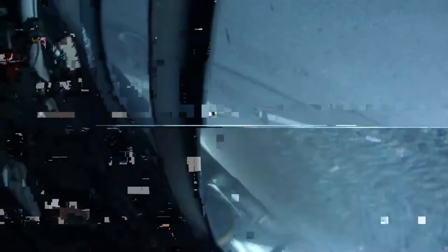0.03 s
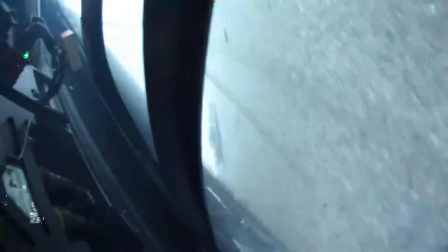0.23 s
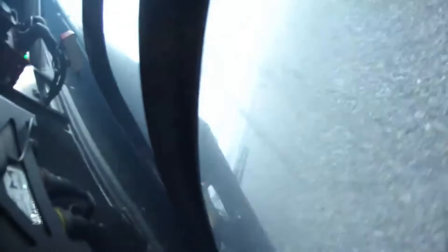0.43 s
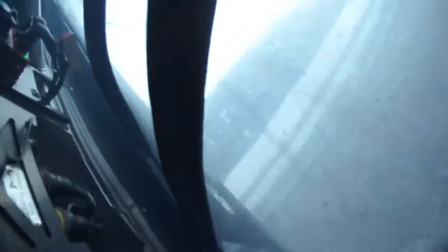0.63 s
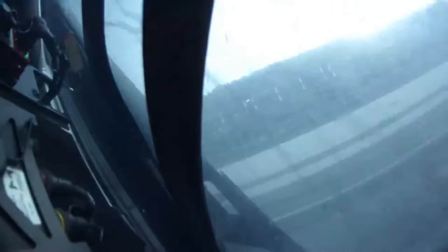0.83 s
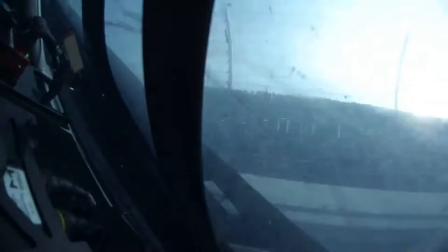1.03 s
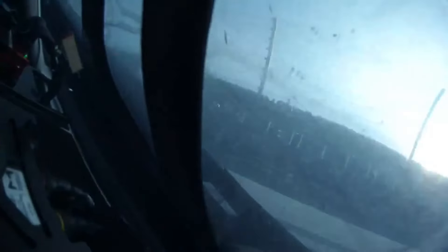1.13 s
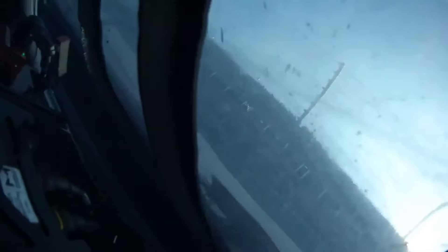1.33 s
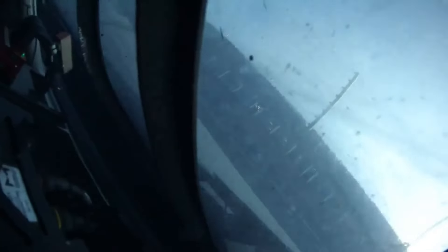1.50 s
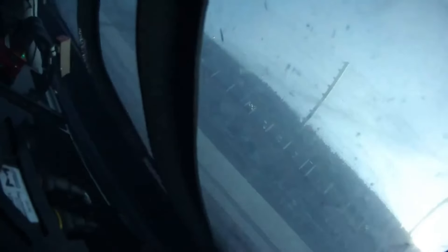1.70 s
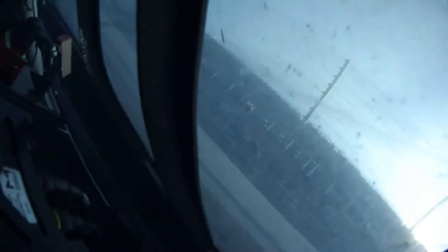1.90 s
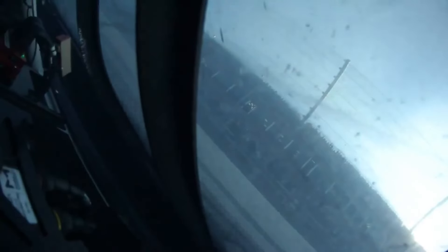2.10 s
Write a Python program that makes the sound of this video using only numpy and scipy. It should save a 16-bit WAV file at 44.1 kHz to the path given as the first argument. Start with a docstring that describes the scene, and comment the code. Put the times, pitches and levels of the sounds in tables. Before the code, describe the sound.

A tumbling race car hits the ground with a hard knock, scrapes and a heavy crunch.

```python
"""A race car tumbles over grass and asphalt, heard from inside the cockpit.
At 0.2 s a hard knock jolts the microphone mount; bodywork then scrapes along the ground in bursts,
with lighter knocks, over the low rumble of the sliding car and a faint drone.
Near 1.4 s the chassis lands with one heavy crunch and rings briefly; the ring drops away quickly.
The wreck goes on shaking faintly through a last knock and a few weak scrapes."""
import sys
import numpy as np
from scipy import signal
from scipy.fft import rfft, irfft
from scipy.io import wavfile

SR = 44100
rng = np.random.default_rng(int(sys.argv[2]) if len(sys.argv) > 2 else 0)


def inscribe(sig):
    """Save sig as 16-bit PCM at rate SR to the path in sys.argv[1].

    A 1-D sig is mono; a 2-D sig holds one channel per row.
    Samples are clipped to [-1, 1] before scaling.
    """
    pcm = np.round(np.clip(np.atleast_2d(sig).T, -1, 1) * 32767)
    wavfile.write(sys.argv[1], SR, pcm.astype(np.int16))


N = 94815

# spectra of sliding, grinding, hissing and cracking: frequency_hz, relative_db
RUMBLE_SPECTRUM = [(25, -3.5), (50, -5), (100, -1.5), (135, 0.5), (200, -3), (350, -3.5), (480, -3),
                   (700, -6), (1100, -10), (2200, -18), (4500, -27.5), (9000, -39), (16000, -60.5)]
GRIND_SPECTRUM = [(30, -10), (150, -6), (400, -5.5), (750, -4), (1300, -2.5), (2300, -6), (3200, -7.5),
                  (4500, -18.5), (9000, -38), (16000, -63)]
HISS_SPECTRUM = [(30, -29), (1500, -18.5), (3500, -5.5), (6500, 3), (8500, -4.5), (10500, -12.5),
                 (13500, -16), (16000, -30)]
CRUNCH_SPECTRUM = [(25, -7), (60, -9), (190, -2), (290, -12), (450, -1.5), (660, -7), (1100, -2.5),
                   (1500, -8), (2100, -7.5), (3100, -12.5), (4300, -16), (8000, -22.5), (12800, -39.5),
                   (15000, -49)]
# envelope of the rumble: time_s, level_db
RUMBLE_LEVELS = [(.2, -39.5), (.28, -45.5), (.46, -47), (.6, -56.5), (.69, -51.5), (.78, -41), (.88, -54),
                 (.98, -55), (1.06, -58.5), (1.33, -58.5), (1.46, -44), (1.58, -53.5), (1.72, -53),
                 (1.8, -49), (1.91, -62.5), (2.06, -55), (2.15, -62)]
# course of the drone: time_s, pitch_hz, level_db
DRONE_TRACK = [(.2, 106.8, -61), (.55, 106.5, -58), (.78, 107.7, -51.5), (.92, 88.8, -72), (1.151, 81, -66),
               (1.352, 80.9, -64), (1.8, 99.1, -68), (1.95, 97, -66), (2.1, 99.5, -60.5)]
# resonances of the shaking wreck and the scraping panels: centre_hz, width_hz, relative_db
WRECK_RESONANCES = [(466, 17, -7), (595, 21, 3.5), (855, 35, 0), (970, 59, -8.5)]
PANEL_RESONANCES = [(1299, 41, 3), (1513, 50, -0.5), (1810, 32, 4.5), (1950, 92, -1), (2173, 70, -4),
                    (2755, 64, -11.5)]
# resonances of the left microphone port: centre_hz, width_hz, added_gain
PORT_RESONANCES = [(1656, 1340, 1.3), (5460, 340, 3.88), (12100, 390, 4.6)]
# bodywork touching the ground: peak_s, attack_s, release_s, grind_db, hiss_db, hollow_db, balance_db
GROUND_CONTACTS = [ (0.2021, .0015, .03, -37.5, -48.5, -52.5, 1), (.288, 0.015, 0.027, -45, -51.5, -52, 1),
                   (.345, 0.02, 0.019, -56.5, -70, -43.5, 5), (0.409, 0.068, 0.057, -52, -65.5, -55, 11),
                   (0.477, 0.019, 0.065, -51.5, -59, -48, 2.5), (0.663, 0.0098, 0.14, -58.5, -64, -63, -1),
                   (0.715, 0.0083, 0.017, -44, -55.5, -35.5, 28.5),
                   (0.752, 0.037, 0.051, -41, -49.5, -64, 2), (0.776, .008, .016, -36, -54, -61, 3.5),
                   (0.96, 0.0051, .014, -60.5, -61, -61, 1), (0.979, 0.021, 0.033, -54.5, -60, -54, -0.5),
                   (1.205, 0.025, 0.036, -68.5, -65.5, -80.5, 1.5),
                   (1.267, 0.021, 0.043, -57, -66, -59, 3.5), (1.49, 0.066, 0.15, -53.5, -61.5, -62, 0),
                   (1.805, 0.046, 0.061, -56, -70.5, -67, 4), (1.956, .006, 0.035, -62.5, -71.5, -70, 2),
                   (2.058, 0.055, 0.055, -58.5, -78, -62, 4)]
# low blows to the frame: start_s, pitch_hz, rise_s, level_db
FRAME_THUMPS = [(0.2211, 140, .0018, -22), (0.453, 45, 0.006, -48), (0.775, 49.4, .005, -49),
                (1.383, 55, 0.006, -27), (1.7748, 55.8, 0.0046, -45.5)]
# blows to the mount: start_s, snap_hz, snap_rise_s, snap_db, snap_balance_db, rebound_share,
# thud_hz, thud_rise_s, thud_db, thud_balance_db, tick_db
MOUNT_KNOCKS = [ (0.2207, 1857, 0.00013, 8, -33, 0.7, 358, 0.00056, -6.5, 7, -17),
                (.7127, 1380, 0.00014, -18.5, 24, 0, 305, 0.0019, -30, 4.5, -44),
                (0.7783, 1510, .00015, -18, 19, 0.53, 149, 0.00096, -31.5, 4, -42),
                (1.1092, 920, 0.0003, -24, 22, 0, 504, 0.00097, -40, -13, -40),
                (1.3735, 1800, .00008, -20, 4, 0.15, 458, 0.0018, -24, -1.5, -31),
                (1.3932, 2200, 0.00013, -2.5, -27, 0.14, 300, 0.00035, -20.5, 13, -21),
                (1.4104, 1600, 0.00007, -9, -26, 0, 400, 0.00078, -16.5, -11, -34),
                (1.7745, 850, 0.00035, -20, 19, 0, 427, 0.00085, -33.5, -29, -38)]
# chassis modes before the quick fade: pitch_hz, relative_db, t60_s
CHASSIS_MODES = [(48.7, -4.5, 1), (115.6, -5.5, 0.46), (168, -9, 0.26), (215, -3.5, 0.083), (469, 1, .25),
                 (563, 3, 0.14), (750, -3, 0.21), (854, -7, 0.71), (1072, -13, 0.41), (1114, -16, 0.49),
                 (1245, -10, 0.22), (1942, -9.5, .25), (3926, -25, 0.27), (4310, -11, 0.24)]

START_S, FADE_S = 0.1956, .002
LANDING_S, LANDING_ATTACK_S = 1.374, 0.0036


def undb(db):
    """Amplitude ratio of a level in decibels."""
    return 10 ** (np.asarray(db) / 20)


def unit(x):
    """Normalisation to rms 1."""
    return x / np.sqrt(np.mean(x ** 2))


def pan(db):
    """Level panning by a balance of left minus right; the louder side keeps its level."""
    return undb(np.minimum([[db], [-db]], 0))


def colour(x, points):
    """Minimum-phase filtering through (frequency_hz, gain_db) points."""
    hz, db = np.array(points, float).T
    size = 4096
    bins_hz = np.maximum(np.arange(size // 2 + 1) * SR / size, 1)
    cepstrum = irfft(np.log(undb(np.interp(np.log(bins_hz), np.log(hz), db))))
    cepstrum[1:size // 2] *= 2
    cepstrum[size // 2 + 1:] = 0
    response = irfft(np.exp(rfft(cepstrum)))
    return signal.fftconvolve(x, response[None], axes=1)[:, :N]


def bandpass(x, hz, width_hz):
    """Response of one damped resonator."""
    return signal.lfilter(*signal.iirpeak(hz, hz / width_hz, fs=SR), x)


def resonate(x, rows):
    """Superposition of resonators (centre_hz, width_hz, relative_db), scaled to rms 1."""
    return unit(sum(undb(db) * bandpass(x, hz, width) for hz, width, db in rows))


def grit(per_s, spread_db):
    """Shot noise: three independent streams of tiny impacts of uneven size."""
    hits = (rng.random((3, N)) < per_s / SR) * rng.standard_normal((3, N))
    return unit(hits * undb(spread_db * np.minimum(rng.exponential(size=(3, N)), 4)))


def stereo(x, shared_hz):
    """Partial coherence: both sides share the bass, while the treble is independent."""
    low, high = (signal.butter(2, shared_hz, kind, fs=SR, output="sos") for kind in ("low", "high"))
    return signal.sosfilt(low, x[2]) + signal.sosfilt(high, x[:2])


def swell(t, attack_s, release_s, hold_s=0):
    """Gaussian attack up to time zero, hold, exponential decay."""
    return np.exp(-(np.minimum(t, 0) / attack_s) ** 2 - np.maximum(t - hold_s, 0) / release_s)


def jolt(t, hz, rise_s):
    """Heavily damped oscillation of a few cycles at most."""
    t = np.maximum(t, 0)
    return t / rise_s * np.exp(1 - t / rise_s) * np.sin(2 * np.pi * hz * t)


def drone(t):
    """A faint low tone on the right wavers by random frequency and amplitude modulation."""
    at, hz, db = np.array(DRONE_TRACK).T
    waver = unit(colour(rng.standard_normal((1, N)), [(1, -4.5), (12, 2), (40, -31), (200, -91)]))[0]
    phase = 2 * np.pi * np.cumsum(np.interp(t, at, hz) * (1 + .025 * waver)) / SR
    return np.sqrt(2) * np.sin(phase) * undb(np.interp(t, at, db) + 1.5 * waver) * pan(db=-12)


def rumble(t):
    """Sliding friction: the car makes low broadband noise, more to the right."""
    noise = unit(colour(stereo(rng.standard_normal((3, N)), shared_hz=590), RUMBLE_SPECTRUM))
    at, db = np.array(RUMBLE_LEVELS).T
    return noise * undb(np.interp(t, at, db)) * pan(db=-12)


def shake(t):
    """Random excitation: after the landing the shaking wreck rings faintly at its resonances."""
    ring = resonate(stereo(rng.standard_normal((3, N)), shared_hz=800), WRECK_RESONANCES)
    return undb(-56.5) * ring * swell(t - LANDING_S, LANDING_ATTACK_S, release_s=.8) * pan(db=-1)


def scrapes(t):
    """Friction on grit drives the panels: coarse grinding, fine hiss and the shell's hollow note."""
    grains = stereo(grit(per_s=9000, spread_db=1.5), shared_hz=497)
    panels = undb(-11.5) * resonate(grains, PANEL_RESONANCES)
    grind = unit(unit(colour(grains, GRIND_SPECTRUM)) + panels)
    hiss = unit(colour(grit(per_s=17000, spread_db=2.0)[:2], HISS_SPECTRUM))
    shell = [(355, 110, 0)]  # centre_hz, width_hz, relative_db
    noise = stereo(rng.standard_normal((3, N)), shared_hz=700)
    hollow = resonate(resonate(noise, shell), shell) * pan(db=-8.5)
    power = 0  # overlapping contacts add in power
    for at, attack, release, grind_db, hiss_db, hollow_db, balance in GROUND_CONTACTS:
        contact = swell(t - at, attack, release) * pan(balance)
        power = power + np.multiply.outer(undb([grind_db, hiss_db, hollow_db]) ** 2, contact ** 2)
    return np.sum(np.sqrt(power) * np.array([grind, hiss, hollow]), axis=0)


def left_port(x):
    """Resonance in the left microphone port colours the airborne sound."""
    peaks = sum(gain * bandpass(x[0], hz, width) for hz, width, gain in PORT_RESONANCES)
    return np.array([x[0] + peaks, x[1]])


def thumps(t):
    """Impulsive loading: the weight of the car comes down on its frame."""
    return sum(undb(db) * jolt(t - at, hz, rise) for at, hz, rise, db in FRAME_THUMPS)


def knocks(t, rebound_s=.00082, thud_lag_s=.00052):
    """Shock excitation: each knock ticks and snaps the mount, may rebound, and leaves a dull thud."""
    tick_spectrum = [(500, -16), (3500, 3), (6000, -4.5), (10000, -17.5), (16000, -30)]
    fizz = unit(colour(rng.standard_normal((2, N)), tick_spectrum))
    out = 0
    for (at, hz, rise, snap_db, balance, rebound,
         thud_hz, thud_rise, thud_db, thud_balance, tick_db) in MOUNT_KNOCKS:
        age = t - at
        snap = undb(snap_db) * (jolt(age, hz, rise) + rebound * jolt(age - rebound_s, hz, rise))
        tick = undb(tick_db) * fizz * swell(age - rise, attack_s=.0001, release_s=.0007)
        thud = undb(thud_db) * jolt(age - thud_lag_s, thud_hz, thud_rise)
        out = out + pan(balance) * (tick - snap) + pan(thud_balance) * thud
    return out


def chassis_ring(t, rattle_depth=0.25, lag_s=.006):
    """Modal vibration: the landed chassis rings, modulated by loose parts; the ring then fades fast."""
    age = t - LANDING_S
    count = len(CHASSIS_MODES)
    rattles = unit(colour(rng.standard_normal((count, N)), [(1, 2), (60, 2), (300, -41)]))
    ring = 0
    for (hz, db, t60), rattle, (start, lead) in zip(CHASSIS_MODES, rattles, rng.random((count, 2))):
        right_lead = np.array([[0], [lead - .5]]) * min(hz / 1200, 1)  # cycles
        phase = 2 * np.pi * (hz * age + start + right_lead)
        decay = undb(-60 * np.maximum(age, 0) / t60)
        ring = ring + undb(db) * (1 + rattle_depth * rattle) * np.sin(phase) * decay
    envelope = swell(age - lag_s, attack_s=.0057, release_s=.017, hold_s=.061)
    return undb(-22.5) * ring * envelope * pan(db=6)


def crunch(t, peak_s=0.02, sag_db_per_s=125):
    """Superposed impulses: a dense burst of cracks merges into one crunch as the car lands."""
    age = t - LANDING_S
    force = swell(age, LANDING_ATTACK_S, release_s=.027, hold_s=.066)
    sag = undb(-sag_db_per_s * np.abs(age - peak_s))
    cracks = stereo(grit(per_s=3000, spread_db=0.5), shared_hz=550)
    return undb(-22) * force * sag * unit(colour(cracks, CRUNCH_SPECTRUM)) * pan(db=2.5)


def scene():
    """Linear superposition of all sources, which set in abruptly after a short silence."""
    t = np.arange(N) / SR
    sliding = left_port(scrapes(t) + rumble(t) + drone(t))
    landing = crunch(t) + chassis_ring(t) + shake(t)
    onset = np.clip((t - START_S) / FADE_S, 0, 1)
    return (sliding + landing + knocks(t) + thumps(t)) * onset


def record(dry):
    """Overload: the hardest knock clips, and a steep low-pass cuts the treble above 14.8 kHz."""
    lowpass = signal.ellip(8, .2, 70, 14800, fs=SR, output="sos")
    return signal.sosfilt(lowpass, np.clip(dry, -1, 1))


dry = scene()
out = record(dry)
inscribe(out)
```